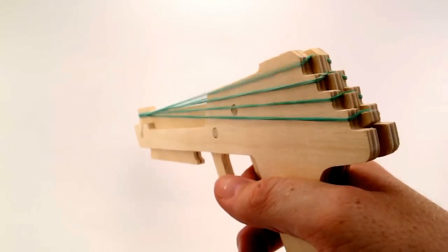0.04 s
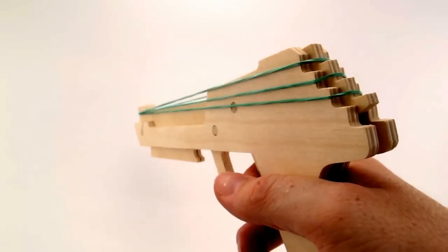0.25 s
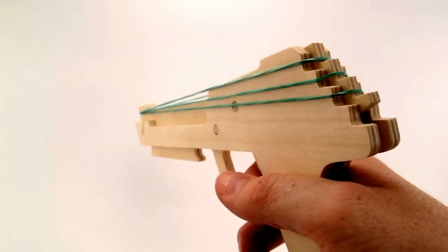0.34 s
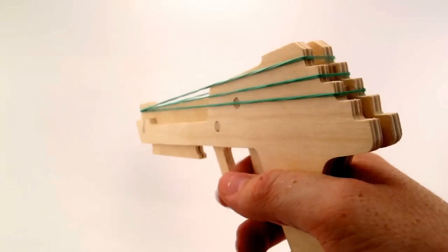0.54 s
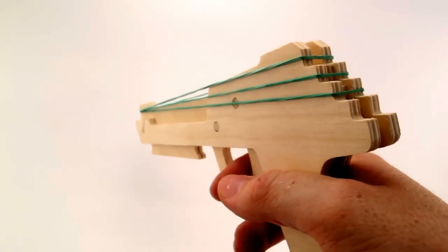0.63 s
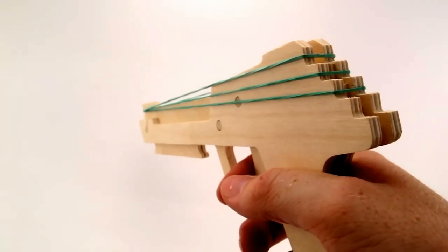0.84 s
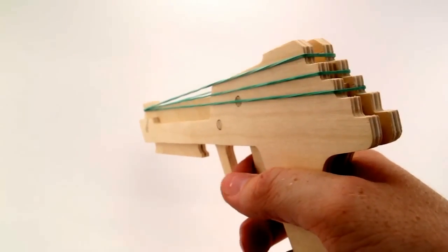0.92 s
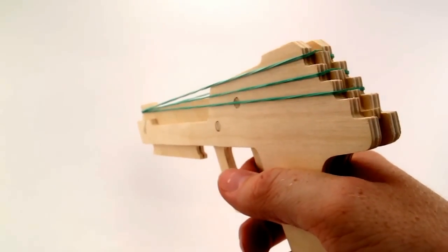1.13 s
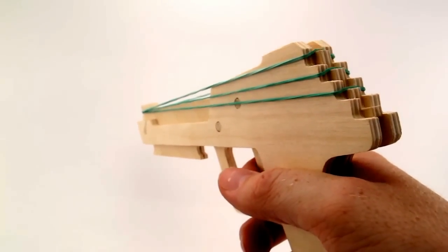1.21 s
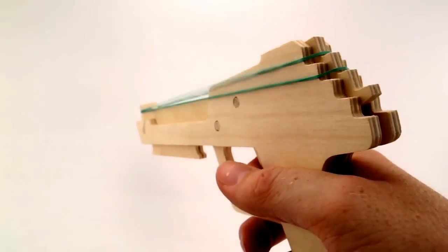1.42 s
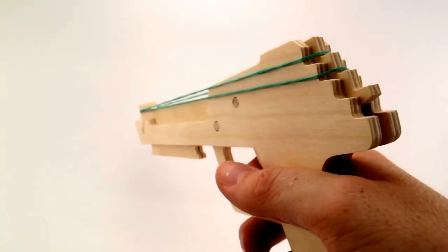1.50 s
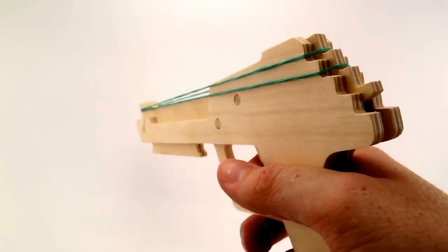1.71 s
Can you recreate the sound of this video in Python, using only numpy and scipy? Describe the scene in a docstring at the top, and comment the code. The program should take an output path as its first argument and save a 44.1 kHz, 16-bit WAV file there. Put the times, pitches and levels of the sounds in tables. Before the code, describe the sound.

A wooden rubber band gun fires twice, close to the microphone in a quiet room. The trigger creaks faintly and a band snaps against the wood with a brief twang. The trigger clacks back, then a second snap follows.

```python
"""A quiet room: a wooden rubber band gun is fired twice, close by.
The trigger creaks, the catch rattles free, a band slaps the wood; frame and remaining bands ring.
Between shots the trigger clacks back. Each snap overloads the recorder, whose gain control
ducks the room noise and lets it swell again."""
import sys
import numpy as np
from scipy import signal
from scipy.fft import rfft, irfft, next_fast_len
from scipy.io import wavfile
from scipy.ndimage import uniform_filter1d

SR = 44100
rng = np.random.default_rng(int(sys.argv[2]) if len(sys.argv) > 2 else 0)


def generate_wav(sig):
    """Save sig (samples, or channels by samples) to the path in sys.argv[1] as 16-bit PCM at SR."""
    pcm = np.round(np.clip(np.atleast_2d(sig).T, -1, 1) * 32767).astype(np.int16)
    wavfile.write(sys.argv[1], SR, pcm)


N = 77175


def snaps(ring_db=5, width_hz=240):
    """Band slaps wood: broad crack plus one damped resonance. Returns bare crack, full slap."""
    hits = [(0.2222, 30.5, 0.0013, 2155), (0.225, 20.5, .0018, 2062), (0.2278, 23, 0.00096, 1883),
            (1.4677, 30, 0.0017, 2730), (1.469, 29.5, .0018, 3460)]  # slaps: t/s, level/dB, decay/s, f/Hz
    spectrum = [(30, -29), (120, -19.5), (300, -13), (800, -9.5), (1400, -10.5), (2100, -3.5), (3100, -3),
                (4300, -8), (6500, -6), (8500, -13), (11000, -19), (16000, -34.5)]  # slap colour: f/Hz, gain/dB
    crack, ring = np.zeros((2, N))
    for start_s, db, decay_s, hz in hits:
        burst = amp(db) * contact(decay_s)
        add(crack, start_s, burst)
        add(ring, start_s, amp(ring_db) * resonate(burst, hz, width_hz))
    return crack, colour(crack + ring, spectrum)


def frame(force, ring_db):
    """A blow plus the short ring it excites in the plywood frame and catch."""
    modes = [(600, 7, 0.015), (979, 3.5, .025), (1300, 3, .015), (1814, 7, 0.036), (2270, 4, 0.021),
             (3330, 1.5, 0.025), (5940, 2.5, 0.017), (6680, 8, .015)]  # resonances: f/Hz, relative peak/dB, t60/s
    ring = np.zeros(N)
    for hz, db, t60_s in modes:
        width_hz = np.log(1000) / (np.pi * t60_s)
        ring += amp(db + ring_db) * resonate(force, hz, width_hz)
    return force + ring


def recoil():
    """Recoil knocks the hollow frame: a brief low thump under each snap."""
    thumps = [(0.2231, 7, 378.7, 0.0057), (1.468, 13.5, 289.4, 0.0017)]  # knocks: t/s, level/dB, f/Hz, decay/s
    t, out = np.arange(SR // 10) / SR, np.zeros(N)
    for start_s, db, hz, decay_s in thumps:
        add(out, start_s, amp(db) * np.sin(2 * np.pi * hz * t) * np.exp(-t / decay_s))
    return out


def trigger_clack():
    """The trigger lands on its stop; the frame rings."""
    hits = [(.6381, 13, .0008), (.6403, 7.5, 0.0015)]  # impacts: t/s, level/dB, decay/s
    spectrum = [(100, -22.5), (480, -25.5), (750, -13.5), (1050, -23), (1400, -1.5), (2500, -8),
                (3500, -14), (4700, -4), (6300, -2.5), (9000, -15), (12000, -25), (16000, -41.5)]  # impact colour: f/Hz, gain/dB
    return frame(blows(hits, spectrum), ring_db=-12.5)


def catch_rattle():
    """The catch knocks free as the band slides over it."""
    hits = [(.2074, -3, .003), (.2105, -2.5, .003), (.2123, 0, 0.0033), (.2157, -5.5, .005),
            (1.458, -5, .005), (1.4605, -10.5, .004), (1.4629, 4.5, .004), (1.465, 4, 0.0022)]  # knocks: t/s, level/dB, decay/s
    spectrum = [(100, -9.5), (500, -20), (1300, -18), (1900, -2.5), (2600, -10), (3400, -8), (4600, -11.5),
                (6000, -9.5), (8000, -9), (10000, -16.5), (12500, -25), (16000, -41.5)]  # knock colour: f/Hz, gain/dB
    return frame(blows(hits, spectrum), ring_db=1.5)


def trigger_creak(grain_spread_db=4):
    """Stick-slip of trigger on wood: friction grains under quick swells."""
    rubs = [(0.01, -14.5, 0.0019, 0.0018), (0.098, -31.5, 0.0015, 0.021), (0.142, -36, .002, 0.017),
            (0.157, -21, 0.00033, 0.0029), (0.173, -32, 0.0015, 0.0092), (0.1793, -19.5, .001, 0.0046),
            (0.1865, -25, 0.00074, 0.0068), (.203, -19, 0.00082, 0.0043), (0.546, -27.5, 0.0034, 0.039),
            (0.58, -22.5, 0.0032, .01), (.605, -23, 0.00086, 0.0023), (0.6249, -10, 0.00088, 0.0057),
            (0.6329, -3.5, 0.0019, 0.0056), (1.095, -31.5, 0.04, 0.045), (1.431, -19.5, 0.0093, 0.02)]  # strokes: t/s, level/dB, rise/s, decay/s
    spectrum = [(100, -30.5), (1000, -18.5), (2000, -8), (3000, -3), (4500, -12), (6500, 0), (9000, -12),
                (12000, -25.5), (16000, -40.5)]  # friction colour: f/Hz, gain/dB
    t, envelope = np.arange(N) / SR, np.zeros(N)
    for start_s, db, rise_s, decay_s in rubs:
        rise = np.minimum(t / rise_s, 1)
        fall = np.exp(-np.maximum(t - rise_s, 0) / decay_s)
        add(envelope, start_s, amp(db) * rise * fall)
    grains = rng.standard_normal(N) * amp(grain_spread_db * rng.standard_normal(N))
    return colour(envelope * grains / grains.std(), spectrum)


def twangs():
    """Bands still stretched on the gun ring; pitch wavers as the rubber moves."""
    tones = [(.2226, -4, 598.3, .17), (0.2242, -18.5, 1830, .45), (.2226, -21.5, 2120, .45),
             (0.2235, -15.5, 2345, .45), (1.469, 3, 956, 0.095), (1.469, -13, 2840, 0.49),
             (1.468, -15, 3750, 0.37)]  # band tones, a new set per shot: t/s, level/dB, f/Hz, t60/s
    t, out = np.arange(SR) / SR, np.zeros(N)
    for start_s, db, hz, t60_s in tones:
        cycles = np.cumsum(hz * waver(SR, depth=0.023, smooth_s=0.0023)) / SR
        add(out, start_s, amp(db) * np.sin(2 * np.pi * cycles) * 1000 ** (-t / t60_s))
    return out


def quivers(width_hz=30):
    """Loose bands shake unevenly after a shot and settle."""
    shakes = [(0.222, -17, 113.1, .045), (1.47, -9, 236.3, 0.033)]  # band motion: t/s, level/dB, f/Hz, decay/s
    t, out = np.arange(N) / SR, np.zeros(N)
    for start_s, db, hz, decay_s in shakes:
        shake = resonate(rng.standard_normal(N), hz, width_hz)
        shake = resonate(shake, hz, width_hz)
        add(out, start_s, amp(db) * shake / shake.std() * np.exp(-t / decay_s))
    return out


def room(x, onset_s=0.011, early_db=5.5, early_s=0.01):
    """Dense stereo reflections, strongest early, each frequency band dying at its own rate."""
    decay = [(100, 0.89), (250, 0.12), (550, 0.51), (800, 0.39), (1400, .5), (3700, 0.47), (7000, 0.52),
             (12000, 0.36)]  # reverberation time: f/Hz, t60/s
    likeness = [(100, 0.93), (700, 1), (1500, 1), (3000, 0.2), (7000, .1)]  # reflections, left to right: f/Hz, correlation
    hz, frame_s, bands = signal.stft(noise_pair(likeness)[:, :SR], SR, nperseg=256)
    fade = 1000 ** (-frame_s / read(decay, hz)[:, None])
    _, tail = signal.istft(bands * fade, SR, nperseg=256)
    t = np.arange(tail.shape[1]) / SR
    tail *= np.minimum(t / onset_s, 1)
    tail *= 1 + amp(early_db) * np.exp(-t / early_s)
    return signal.fftconvolve(x[None], tail / np.linalg.norm(tail[0]), axes=1)[:, :N]


def air(noise_db=-17, hum_hz=115.9, hum_db=-43):
    """Steady room air and a low hum of wavering level."""
    spectrum = [(15, -7), (35, 2.5), (70, -5.5), (125, 0.5), (200, -3), (300, -6), (450, -14), (700, -13.5),
                (900, -20), (1600, -16), (2300, -22), (3200, -22), (4500, -32.5), (6500, -28),
                (9000, -38.5), (12000, -44), (16000, -50)]  # air colour: f/Hz, gain/dB
    likeness = [(100, 0.98), (600, 1), (1400, 1), (3000, 0.47), (7000, 0.13), (15000, .1)]  # air, left to right: f/Hz, correlation
    swell = waver(N, depth=0.5, smooth_s=0.054)
    hum = swell * np.sin(2 * np.pi * (hum_hz * np.arange(N) / SR + rng.random()))
    return amp(noise_db) * colour(noise_pair(likeness), spectrum) + amp(hum_db) * hum


def contact(decay_s, passes=6):
    """Rough contact: a dying noise burst with a near-flat spectrum."""
    t = np.arange(0, 10 * decay_s, 1 / SR)
    fade = np.exp(-t / decay_s)
    grit = rng.standard_normal(N)[:len(t)]
    for _ in range(passes):
        bins = rfft(grit * fade)
        flat = irfft(bins / (abs(bins) + 1e-9), len(t))
        grit = np.clip(flat * np.linalg.norm(fade) / fade, -3, 3)
    return grit * fade


def blows(hits, spectrum):
    """A series of contact bursts in one colour."""
    out = np.zeros(N)
    for start_s, db, decay_s in hits:
        add(out, start_s, amp(db) * contact(decay_s))
    return colour(out, spectrum)


def resonate(x, hz, width_hz):
    """One resonance, unity peak gain."""
    radius = np.exp(-np.pi * width_hz / SR)
    pole = radius * np.exp(2j * np.pi * hz / SR)
    return 2 * signal.lfilter([1 - radius], [1, -pole], x).real


def colour(x, spectrum, lag=None):
    """Minimum-phase filter (f/Hz, gain/dB) with optional extra lag (f/Hz, phase/rad)."""
    size = next_fast_len(2 * N)
    hz = np.fft.fftfreq(size, 1 / SR)
    log_gain = np.log(amp(read(spectrum, abs(hz))))
    response = np.exp(np.conj(signal.hilbert(log_gain)))
    if lag:
        response *= np.exp(-1j * np.sign(hz) * read(lag, abs(hz)))
    return np.fft.ifft(np.fft.fft(x, size) * response).real[..., :N]


def noise_pair(likeness):
    """Stereo white noise, correlation set per frequency."""
    left, other = rfft(rng.standard_normal((2, N)))
    same = np.clip(read(likeness, np.fft.rfftfreq(N, 1 / SR)), -1, 1)
    right = same * left + np.sqrt(1 - same ** 2) * other
    return irfft(np.array([left, right]), N)


def waver(samples, depth, smooth_s):
    """Random factor around 1, standard deviation depth."""
    drift = uniform_filter1d(rng.standard_normal(samples), round(smooth_s * SR))
    return 1 + depth * drift / drift.std()


def amp(db):
    return 10 ** (np.asarray(db) / 20)


def read(curve, hz):
    """Curve value at hz, interpolated in log frequency."""
    knots_hz, values = np.transpose(curve)
    return np.interp(np.log(hz + 1), np.log(knots_hz + 1), values)


def add(mix, start_s, sound):
    part = mix[round(start_s * SR):][:len(sound)]
    part += sound[:len(part)]


def scene(slap_send_db=-11, parts_send_db=-19):
    """Gun, reflections, room air."""
    radiation = [(60, -17.5), (200, -12.5), (400, -13), (800, -14.5), (1500, -13), (2200, -15.5),
                 (3200, -16), (4500, -27), (7000, -20), (10000, -34.5), (16000, -52.5)]  # snap colour into the room: f/Hz, gain/dB
    crack, slap = snaps()
    shots = frame(slap, ring_db=-5) + recoil()
    parts = trigger_creak() + trigger_clack() + catch_rattle()
    send = colour(crack + amp(slap_send_db) * shots, radiation) + amp(parts_send_db) * parts
    return shots + parts + twangs() + quivers() + room(send) + air()


def record(dry, limit_db=-10, sense_s=0.0036, duck_s=0.0018, recover_db_per_s=17.5):
    """Two microphone ports, limiter (fast duck, slow recovery), overload, low-pass."""
    left_port = [(100, -2.7), (1000, -2.23), (2300, -0.5), (3300, 3), (4100, 6), (5100, -5), (6500, -10),
                 (8000, -13.5), (10000, -5), (16000, -14)]  # left response: f/Hz, gain/dB
    right_port = [(100, -0.9), (1000, -1), (2300, -2.5), (3300, -3), (4100, 3.5), (5100, 9), (6500, 6.5),
                  (8000, 3), (10000, -3.5), (16000, -0.5)]  # right response: f/Hz, gain/dB
    left_lag = [(30, .03), (250, 0.42), (700, 0.58), (1400, 0.73), (2600, 0.5), (4000, 0.24), (6000, .3),
                (9000, 1.1), (16000, 0.4)]  # left behind right: f/Hz, phase/rad
    ceiling, cutoff_hz = 0.93, 16200
    x = np.array([colour(dry[0], left_port, left_lag), colour(dry[1], right_port)])
    power = abs(uniform_filter1d((x ** 2).mean(0), round(sense_s * SR)))
    level_db = 10 * np.log10(power + 1e-12)
    recovery_db = np.arange(N) / SR * recover_db_per_s
    held_db = np.maximum.accumulate(level_db + recovery_db) - recovery_db  # sinking peak hold
    over_db = np.maximum(held_db - limit_db, 0)
    pole = np.exp(-1 / (duck_s * SR))
    duck_db = signal.lfilter([1 - pole], [1, -pole], over_db)
    clipped = np.clip(x / amp(duck_db), -ceiling, ceiling)
    lowpass = signal.firwin(255, cutoff_hz, window=("kaiser", 8), fs=SR)
    return signal.oaconvolve(clipped, lowpass[None], "same")


dry = scene()
out = record(dry)
generate_wav(out)
```